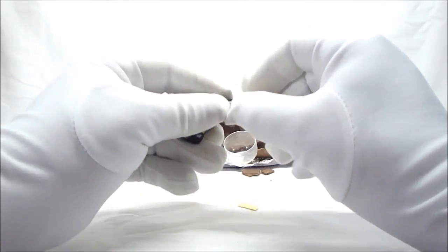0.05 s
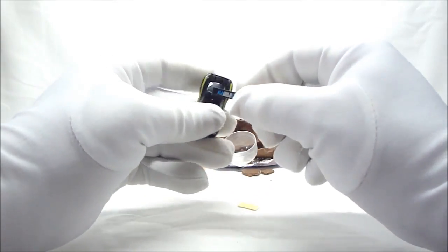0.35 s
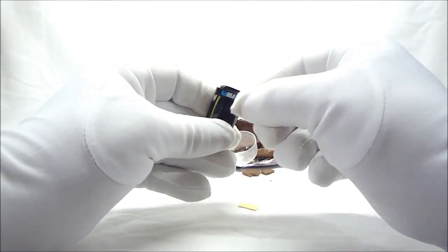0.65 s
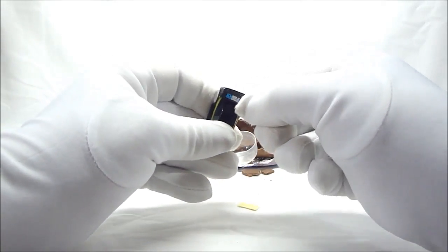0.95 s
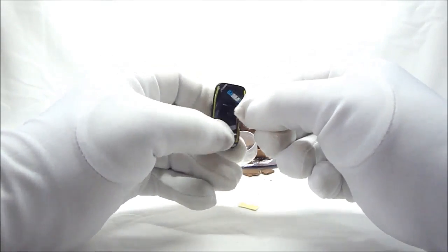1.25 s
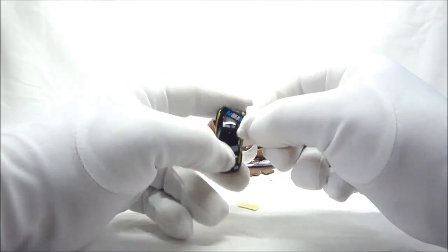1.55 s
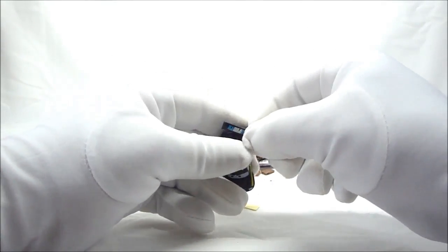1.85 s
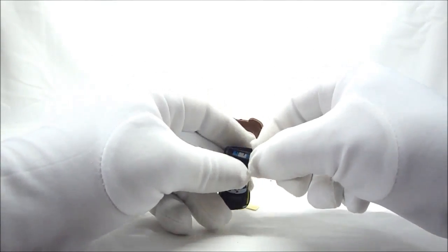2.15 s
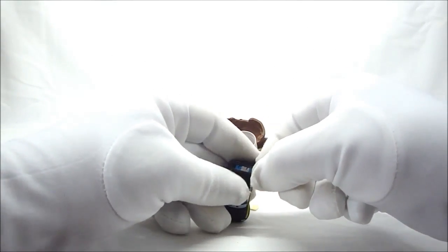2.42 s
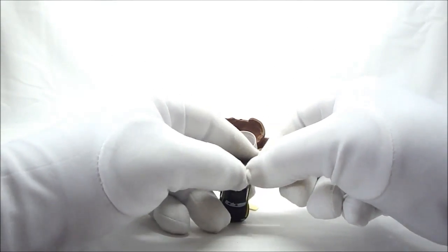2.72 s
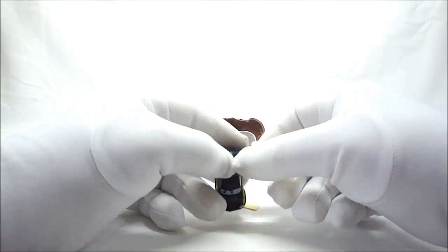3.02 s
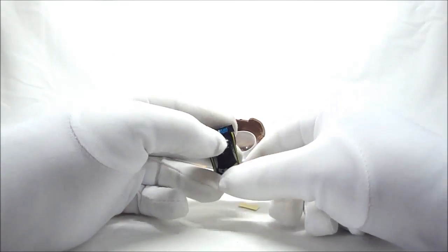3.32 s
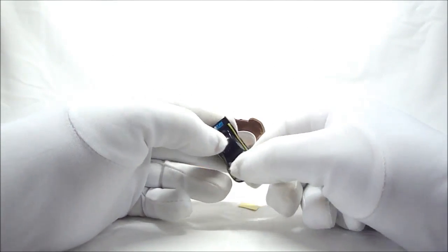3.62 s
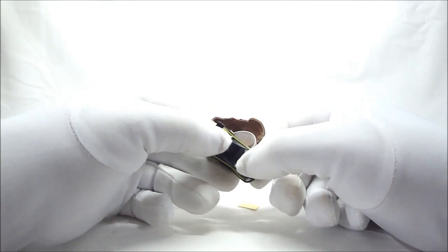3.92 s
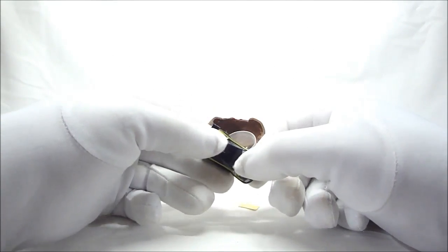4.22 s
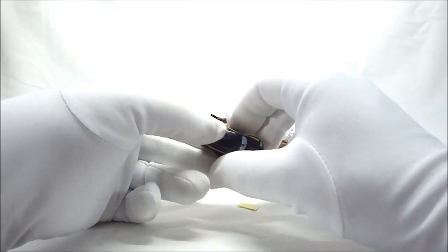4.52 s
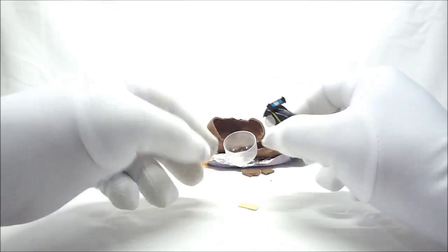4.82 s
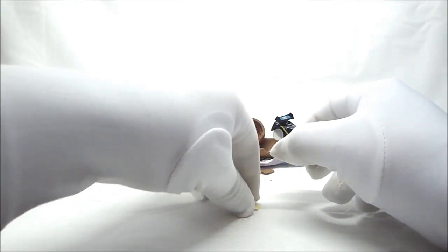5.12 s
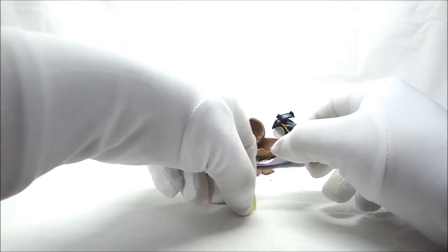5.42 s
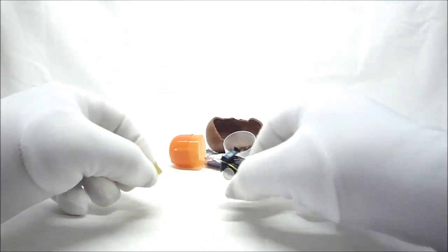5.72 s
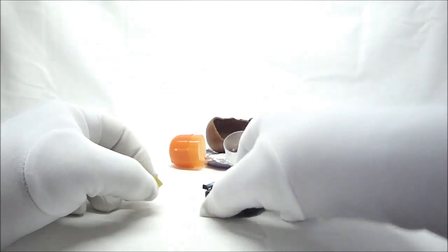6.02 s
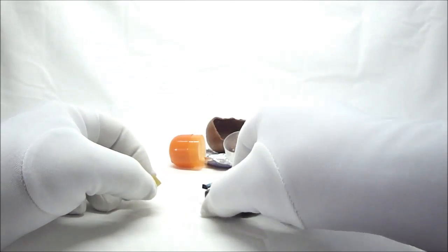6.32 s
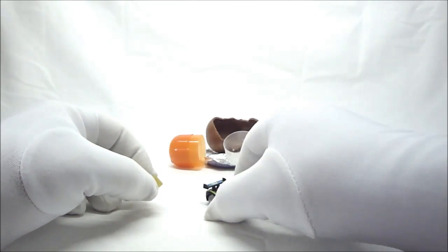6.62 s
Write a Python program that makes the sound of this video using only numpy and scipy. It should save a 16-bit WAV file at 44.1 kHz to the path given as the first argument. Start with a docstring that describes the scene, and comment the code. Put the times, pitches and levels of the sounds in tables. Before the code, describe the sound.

A tiny plastic toy is pressed together close by in a small room, over a faint steady hiss. Light clicks and tiny creaks come between 0.2 and 0.6 seconds. At 0.8 a peg snaps in sharply with a dull little thump of the fingers. From 1.2 to 1.8 small ticks and short creaks cluster, with a sharp click at 1.3. A quick double snap follows at 1.9, a lighter click at 2.4, and the loudest snap at 2.8. Each is bright and very short, with a slight room echo. From 3 to 6 seconds there are only scattered faint ticks and very soft brushing of cloth gloves on plastic. At about 6.1 the toy lands on a table with a clack and skids to rest in a split second. Two faint ticks follow around 6.7.

```python
"""In a small room, gloved hands press a tiny plastic toy together close by, then set it on a table. Pegs and
catches snap home and ring for a millisecond or two, and edges stick and slip in small creaks. A few dull low
thumps sound now and then, close on the loudest snaps. The cloth gloves brush faintly over the plastic. The toy
lands with a clack and skids to rest. The room echoes briefly over a steady hiss."""
import sys
import numpy as np
from scipy import signal
from scipy.fft import rfft, irfft
from scipy.io import wavfile

SR = 44100
rng = np.random.default_rng(int(sys.argv[2]) if len(sys.argv) > 2 else 0)


def generate_wav(signal):
    """Clip the signal to [-1, 1] and save it as 16-bit WAV at the path in sys.argv[1]."""
    frames = np.transpose(np.atleast_2d(signal))
    scaled = np.clip(frames, -1, 1) * 32767
    pcm = np.round(scaled).astype(np.int16)
    wavfile.write(sys.argv[1], SR, pcm)


N = 302526
TIME = np.arange(N) / SR
CONTACT_SAMPLES = 1024


def undb(db):
    """Turn decibels into a number to multiply by."""
    return 10 ** (np.asarray(db) / 20)


def colour(x, points):
    """Shape a sound's bass and treble along a curve of (f/Hz, level/dB); the result has rms 1."""
    hz, db = np.transpose(points)
    bins_hz = np.maximum(np.fft.rfftfreq(len(x), 1 / SR), 1)
    gain = undb(np.interp(np.log(bins_hz), np.log(hz), db))
    shaped = irfft(rfft(x) * gain, len(x))
    return shaped / np.std(shaped)


def lowpass(x, hz):
    """Cut the treble steeply above hz."""
    return signal.sosfilt(signal.ellip(8, .2, 70, hz, fs=SR, output="sos"), x)


def add(track, s, sound):
    """Mix a short sound into a track at s seconds."""
    start = int(s * SR)
    track[start:start + len(sound)] += sound[:len(track) - start]


# The tone of the hiss, from bass to treble: f/Hz, level/dB
HISS_TONE = [(15, -57), (25, -21), (49, -32), (76, -16.5), (111, -16.5), (185, -7), (242, -5), (285, -4.5),
             (317, -2.5), (416, -1), (962, -1.5), (2160, -6.5), (5000, -13), (14000, -19.5), (16000, -22)]

def hiss(level_db=-48):
    """Room air and microphone noise make a steady hiss."""
    return undb(level_db) * colour(rng.standard_normal(N), HISS_TONE)


# The notes each part rings with (a wider note dies sooner): f/Hz, width/Hz, level/dB
PART_NOTES = { "shell": [(4200, 300, -20), (5100, 260, -18), (6350, 430, 0), (7260, 690, 0.5),
              (8300, 490, -11), (10800, 650, -13), (13900, 820, -12)], "peg": [(1220, 1200, -12),
              (3700, 300, -22.5), (5400, 530, -9.5), (6140, 850, -4), (7600, 560, -9), (13500, 580, -5),
              (13200, 500, -0.5), (15400, 700, -5)], "rim": [(5160, 500, -19), (6540, 740, -4.5),
              (7670, 440, -7), (8350, 610, -0.5), (9740, 590, -10), (13600, 1400, -9)],
              "catch": [(1720, 380, -9.5), (2350, 350, -6), (2900, 260, -10.5), (4280, 330, -11),
              (5580, 460, -7.5), (8050, 510, 3.5), (9760, 680, 0.5), (11100, 540, -4), (12300, 590, -11),
              (14000, 690, -6), (15500, 900, -7.5)], "body": [(450, 760, -24), (1180, 340, -16),
              (2360, 490, -20), (4060, 300, -4.5), (4450, 380, -1.5), (5600, 480, 1), (5900, 400, -2),
              (7060, 340, -10), (7800, 440, -10), (8700, 380, -10.5), (11300, 1500, -14),
              (14000, 950, -16)], "tab": [(4100, 400, -12), (5370, 340, -5), (5840, 310, -4),
              (8400, 700, -10)], "table": [(594, 140, -17), (1100, 190, -6.5), (1380, 170, -6),
              (2380, 350, -11.5), (5140, 290, -3.5), (5600, 400, 0), (6100, 360, -3), (7240, 270, -4.5),
              (8130, 310, -7.5), (9130, 550, -4.5), (11900, 950, -4), (14800, 1400, -9)], }
# Each part's surface crack and its share sent into the room: crack level/dB, room level/dB
PART_CRACK_AND_ROOM = {"shell": (-35, -16.5), "peg": (-25, -21), "rim": (-33, -20), "catch": (-27, -17.5),
                       "body": (-24, -17), "tab": (-28, -13.5), "table": (-32, -17)}

def strike(part, tilt_db, pitch_scatter=0.0059, contact_s=0.000081, crack_s=0.0019):
    """One contact, peak near 1: the part rings and its rough surface gives a tiny crack."""
    t = np.arange(CONTACT_SAMPLES) / SR
    hz, width_hz, db = np.transpose(PART_NOTES[part])[:, :, None]
    crack_db, _ = PART_CRACK_AND_ROOM[part]
    hz = hz * (1 + pitch_scatter * rng.standard_normal(hz.shape))  # the grip shifts the notes a little
    gain = undb(db + tilt_db * np.log2(hz / hz.mean()))  # more tilt per octave sounds brighter
    phase = rng.uniform(0, 2 * np.pi, hz.shape)
    notes = gain * np.exp(-np.pi * width_hz * t) * np.sin(2 * np.pi * hz * t + phase)
    ring = notes.sum(axis=0) / np.linalg.norm(gain)
    crack = undb(crack_db) * np.exp(-t / crack_s) * rng.standard_normal(len(t))
    onset = 1 - np.exp(-(t / contact_s) ** 2)
    bass_cut = signal.butter(3, 380, "high", fs=SR, output="sos")  # small parts give off almost no bass
    return signal.sosfilt(bass_cut, onset * (ring + crack))


# Parts that rattle as they snap in or land:
# t/s, first level/dB, tilt/(dB per octave), part, number of contacts, gap/s, change per contact/dB
RATTLING_SNAPS = [ (0.245, -25.5, -4, "shell", 2, .0027, -6), (1.1752, -19, -4, "shell", 3, 0.0015, 0),
                  (1.2399, -17, -3, "shell", 3, 0.002, 1.5), (1.5025, -24.5, 2, "shell", 2, .005, -3),
                  (1.8928, -6, 2, "catch", 2, .0019, 1), (2.4276, -15.5, -0.5, "catch", 2, .0063, -9.5),
                  (2.7851, -2, 3.5, "body", 3, .0024, -8), (3.409, -24, 2, "tab", 2, 0.0022, -1.5),
                  (6.0709, -3.5, 0, "table", 3, .0032, -2), ]
# Parts that touch just once: t/s, level/dB, tilt/(dB per octave), part
SINGLE_TAPS = [ (0.4255, -11.5, 5.5, "shell"), (0.5643, -28, 4, "shell"), (.8420, -3.5, -3, "peg"),
               (1.1563, -23.5, -4, "shell"), (1.2822, -28, -2, "shell"), (1.3130, -6, -2, "rim"),
               (1.3723, -30, 0, "shell"), (1.4061, -28, 3, "shell"), (1.4826, -25, -3, "shell"),
               (1.7376, -28, -8, "rim"), (1.8608, -12.5, -0.5, "catch"), (2.1026, -30, 1, "catch"),
               (2.784, -13.5, -6, "body"), (3.766, -33, -8, "table"), (4.3473, -34, 3, "body"),
               (4.7482, -29.5, 8, "shell"), (5.2938, -27, 3, "rim"), (5.6385, -29, 6, "rim"),
               (6.6718, -33, 0, "tab"), (6.782, -31.5, -2, "shell"), ]

def clicks(bounce_tilt_db=1):
    """Parts tap, snap home and land; returns the direct sound and the share sent into the room."""
    direct, to_room = np.zeros(N), np.zeros(N)
    contacts = list(SINGLE_TAPS)
    for s, db, tilt_db, part, count, gap_s, change_db in RATTLING_SNAPS:
        for k in range(count):  # each further contact is shorter and so brighter
            contacts.append((s + k * gap_s, db + k * change_db, tilt_db + k * bounce_tilt_db, part))
    for s, db, tilt_db, part in contacts:
        click = undb(db) * strike(part, tilt_db)
        _, room_db = PART_CRACK_AND_ROOM[part]
        add(direct, s, click)
        add(to_room, s, undb(room_db) * click)
    return direct, to_room


# The tone of the room's echo: f/Hz, level/dB
ECHO_TONE = [(200, -8), (650, -4), (1400, -9), (3000, -1.5), (4400, 0.5), (5700, 4), (7200, -4), (8700, 0),
             (12000, -4), (16000, -6)]
# Hollow notes that outlast the echo: f/Hz, level against the echo/dB, time to fade by 60 dB/s
HOLLOW_NOTES = [(580, -30, .32), (726, -34, .26)]

def room(x, fade_60db_s=0.15, delay_s=0.0036):
    """Nearby surfaces throw back an echo that dies quickly; two hollow notes linger."""
    t = np.arange(SR // 2) / SR
    echo = colour(rng.standard_normal(len(t)), ECHO_TONE) * undb(-60 * t / fade_60db_s)
    hollow = sum(undb(db - 60 * t / ring_s) * np.sin(2 * np.pi * hz * t)
                 for hz, db, ring_s in HOLLOW_NOTES)
    answer = (echo + hollow) * (t > delay_s)
    return signal.fftconvolve(x, answer / np.linalg.norm(answer))[:N]


# Edges dragging over each other: t/s, length/s, level of a typical slip/dB
EDGE_DRAGS = [(0.253, .045, -44), (0.303, .019, -32), (0.434, .014, -42), (0.495, .065, -45),
              (1.16, .022, -34), (1.246, .014, -42), (1.305, .006, -26.5), (1.323, .025, -42),
              (1.406, .034, -32), (1.489, .024, -40), (1.675, .02, -41), (1.75, .02, -40.5)]

def creaks(slip_gap_s=.0024, uneven_db=3):
    """Edges stick and slip, making uneven runs of tiny contacts on the toy's shell."""
    out = np.zeros(N)
    for start_s, length_s, db in EDGE_DRAGS:
        gaps = rng.uniform(.5, 1.5, 32)
        lags_s = slip_gap_s * (np.cumsum(gaps) - gaps[0])
        levels_db = db + uneven_db * rng.standard_normal(len(gaps))
        for lag_s, slip_db in zip(lags_s, levels_db):
            slip = strike("shell", tilt_db=-1)
            if lag_s < length_s:
                add(out, start_s + lag_s, undb(slip_db) * slip)
    return out


# Dull low thumps, each close on a loud snap: t/s, level/dB, rise time/s
LOW_THUMPS = [(.8422, -29.5, 0.00038), (.8705, -41, 0.00073), (1.8945, -59, 0.0018), (1.9182, -51, .0012),
              (2.7853, -41, 0.00055)]

def thumps(tail_db=-17, tail_s=0.0083):
    """Each thump rises in a quick push, then a slower, softer swell follows."""
    out = np.zeros(N)
    t = np.arange(2 * CONTACT_SAMPLES) / SR
    for peak_s, db, rise_s in LOW_THUMPS:
        push = (t / rise_s * np.exp(1 - t / rise_s)) ** 2
        tail = undb(tail_db) * t / tail_s * np.exp(1 - t / tail_s)
        add(out, peak_s - rise_s, undb(db) * (push + tail))
    return signal.sosfilt(signal.butter(1, 25, "high", fs=SR, output="sos"), out)


def friction(pressure, tone, uneven_db):
    """Countless tiny, uneven contacts blur into a rubbing noise that grows with pressure."""
    grains = np.repeat(rng.standard_normal(N // 64 + 1), 64)[:N]  # a new size about every 1.5 ms
    rough_noise = rng.standard_normal(N) * undb(uneven_db * grains)
    return pressure * colour(rough_noise, tone)


# Strokes of the gloves: middle t/s, length/s, level/dB
GLOVE_STROKES = [(1.65, .7, -63), (2.103, 0.22, -55), (3.5, 0.58, -61), (4.026, .25, -60),
                 (4.355, 0.12, -54.5), (4.484, 0.26, -54.5), (5.19, .5, -59), (5.74, .1, -61),
                 (6.83, .15, -60)]
# The tone of cloth on plastic: f/Hz, level/dB
GLOVE_TONE = [(2500, -13), (5000, -3), (7200, -1), (8400, 0.5), (9400, -9), (11000, 1), (12500, -8),
              (16000, -20)]

def gloves(grip_db=-67.5, flutter_hz=87, flutter_depth=.45):
    """Cloth brushes the plastic in strokes that swell and fade, with a fine, fast flutter."""
    strokes = sum(undb(db) * np.cos(np.pi * np.clip((TIME - middle_s) / length_s, -.5, .5)) ** 2
                  for middle_s, length_s, db in GLOVE_STROKES)
    pressure = undb(grip_db) + strokes  # the gloves never lie quite still
    flutter = 1 + flutter_depth * np.sin(2 * np.pi * flutter_hz * TIME)
    return friction(pressure * flutter, GLOVE_TONE, uneven_db=4)


# The tone of the toy sliding on the table: f/Hz, level/dB
SKID_TONE = [(100, -37), (180, -6.5), (340, -20), (490, 0), (750, 1.5), (1000, -11), (1600, -9),
             (2150, -2.5), (3300, -12.5), (4200, -5), (5800, -16), (9500, -16), (16000, -26)]

def skid(start_s=6.078, level_db=-31, rise_s=0.016, hold_s=.011, fade_db_per_s=560):
    """The landed toy digs in, slides briefly and slows to rest."""
    age_s = TIME - start_s
    digging_in = np.clip(age_s / rise_s, 0, 1)
    slowing_s = np.maximum(age_s - rise_s - hold_s, 0)
    pressure = digging_in * undb(level_db - fade_db_per_s * slowing_s)
    return friction(pressure, SKID_TONE, uneven_db=2)


def scene(slides_to_room_db=-16):
    """Mix plastic, gloves and hiss into one channel; the clicks, creaks and skid also echo."""
    direct_clicks, clicks_to_room = clicks()
    slides = creaks() + skid()
    echo = room(clicks_to_room + undb(slides_to_room_db) * slides)
    soft_sounds = lowpass(slides + echo + gloves() + hiss(), hz=15700)
    return (direct_clicks + thumps() + soft_sounds)[None]


def record(dry):
    """Cut the very highest treble from the whole mix."""
    return lowpass(dry, hz=16500)


dry = scene()
out = record(dry)
generate_wav(out)
```